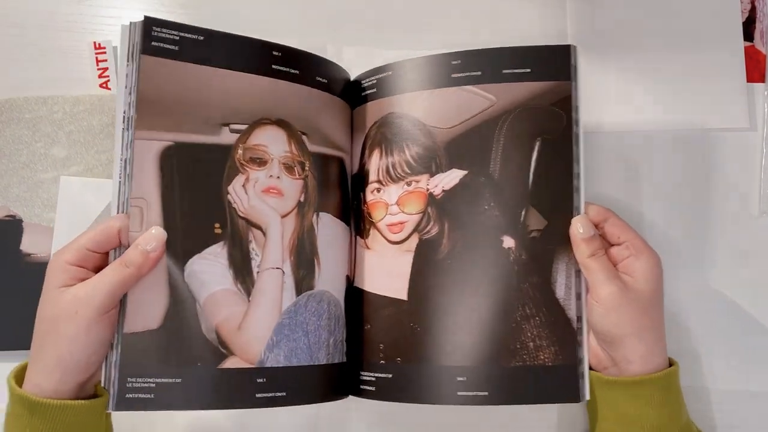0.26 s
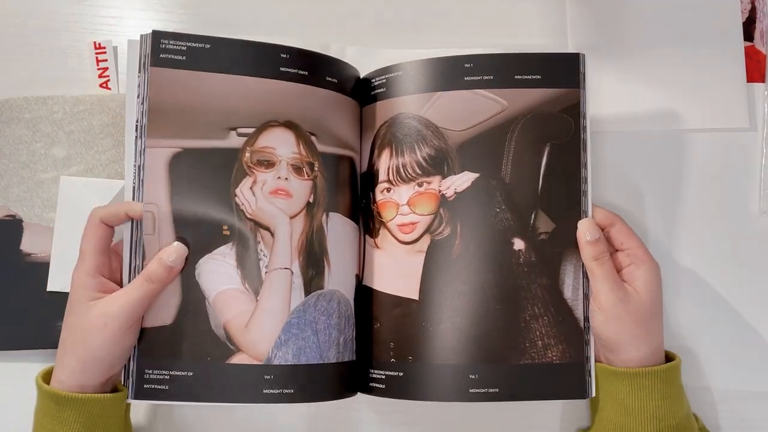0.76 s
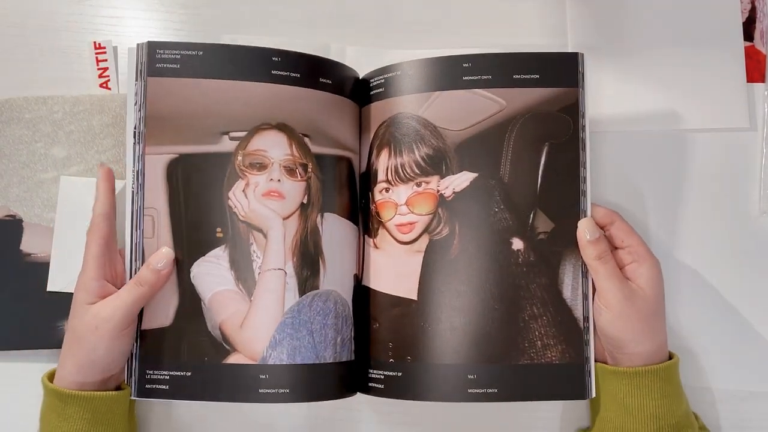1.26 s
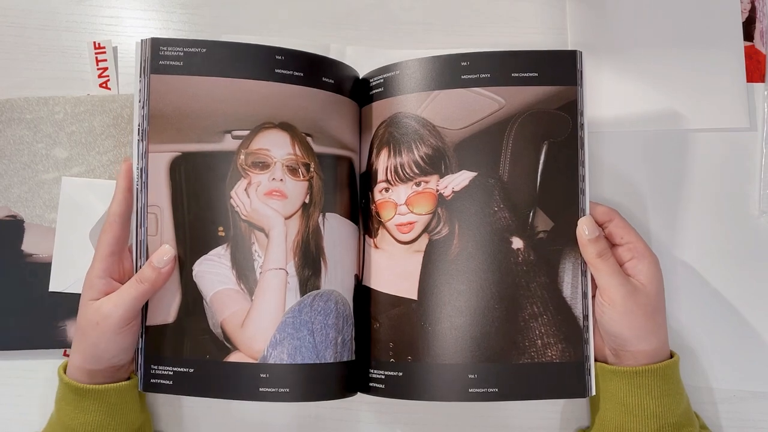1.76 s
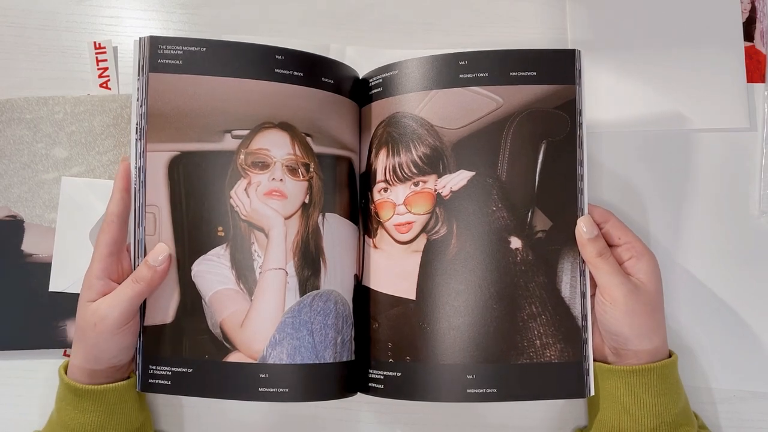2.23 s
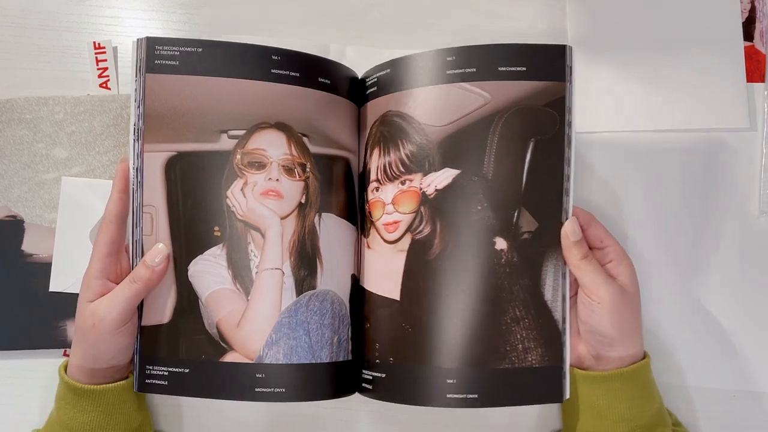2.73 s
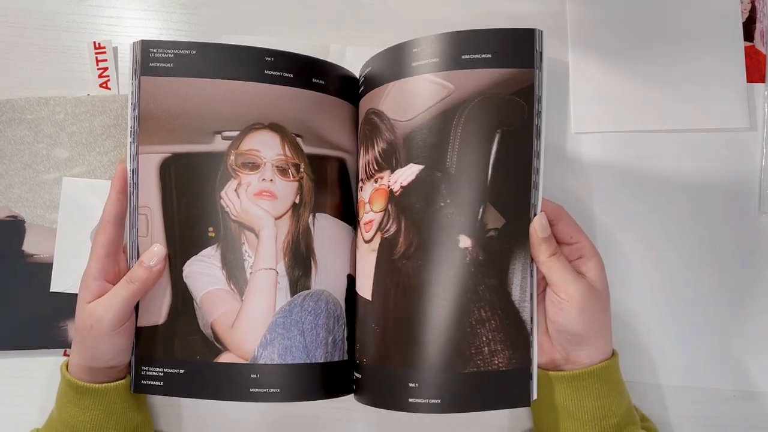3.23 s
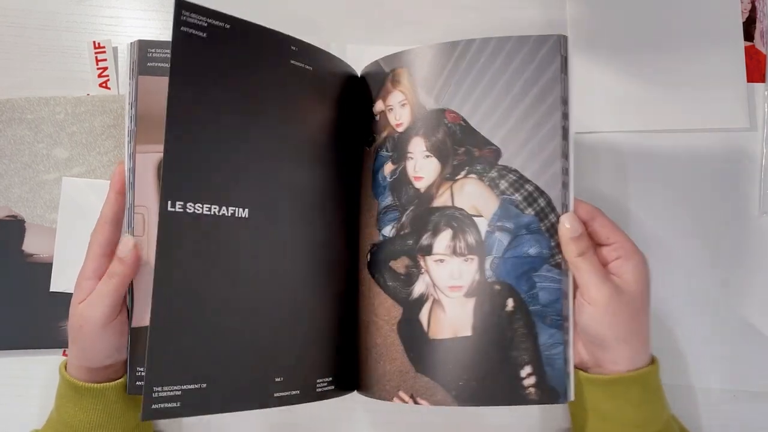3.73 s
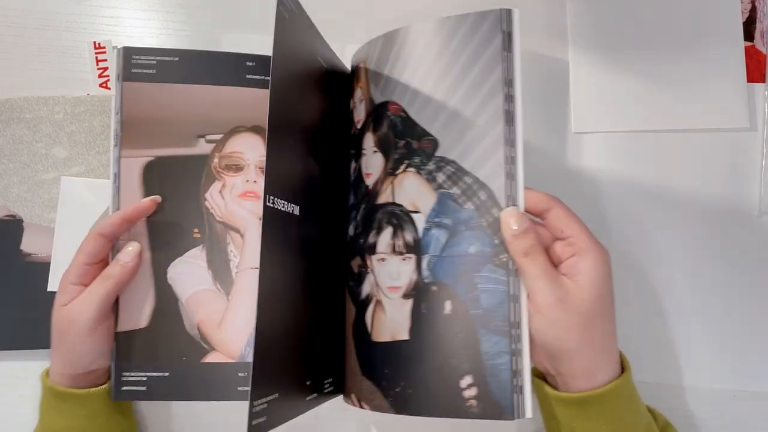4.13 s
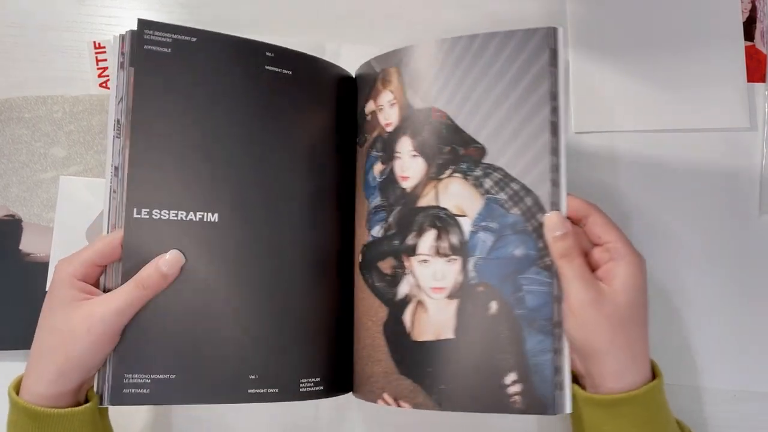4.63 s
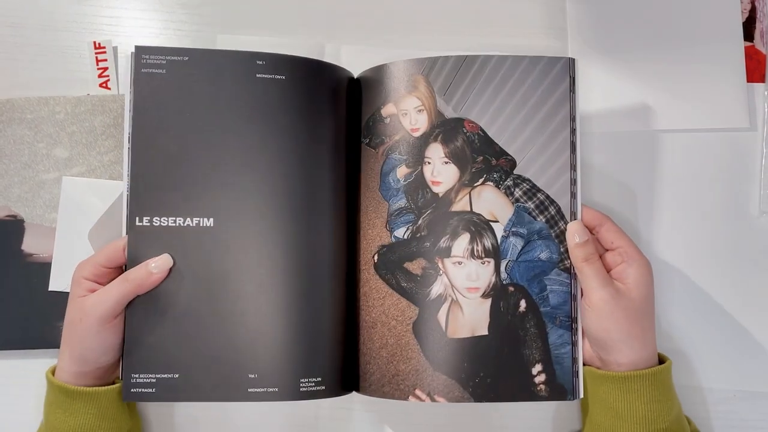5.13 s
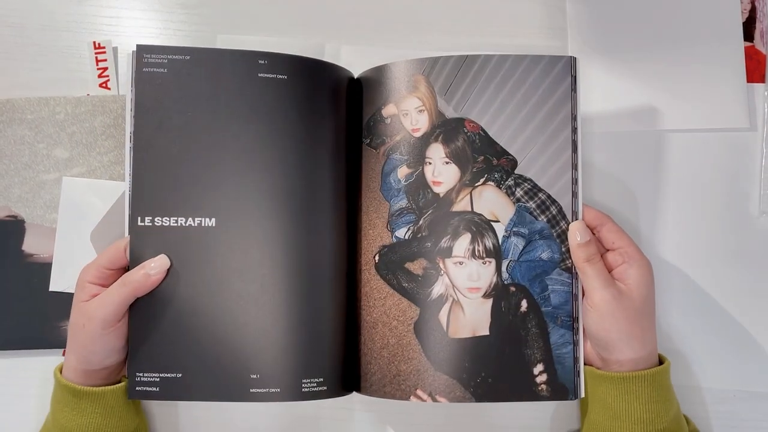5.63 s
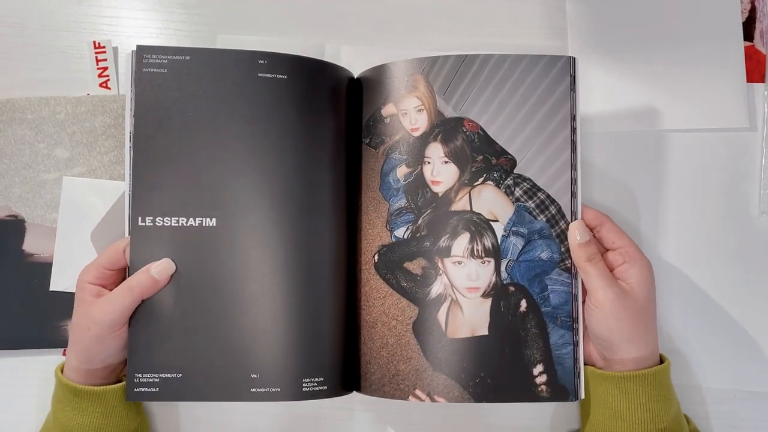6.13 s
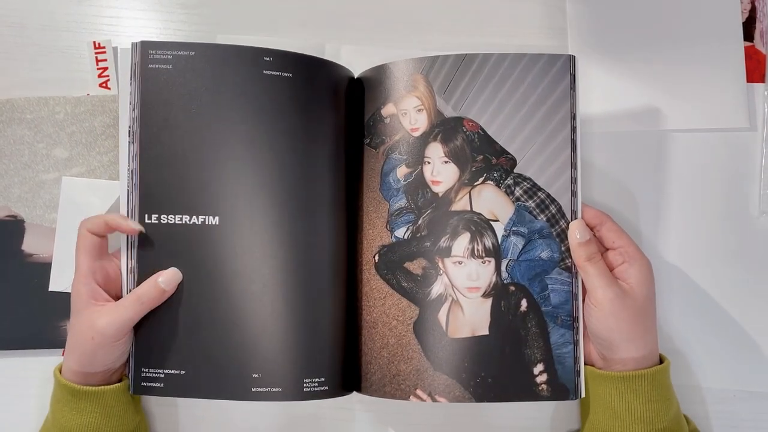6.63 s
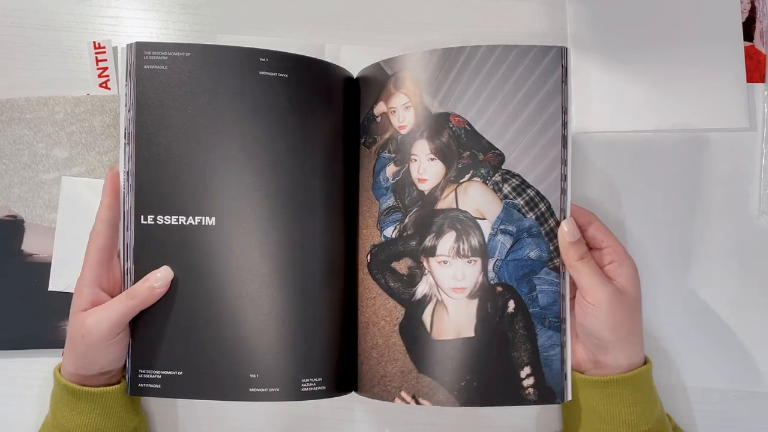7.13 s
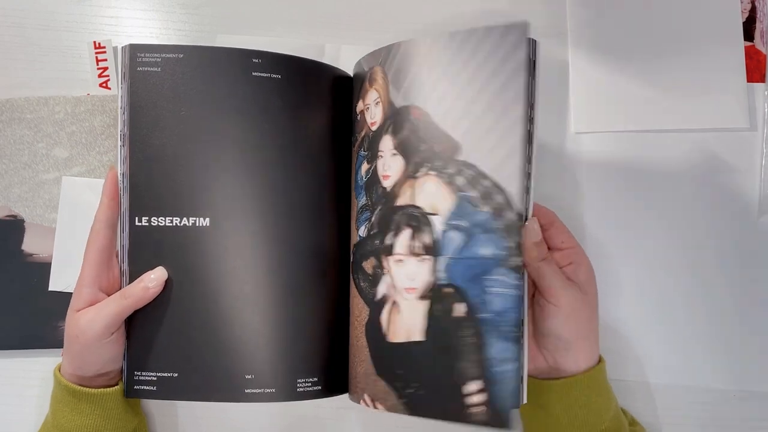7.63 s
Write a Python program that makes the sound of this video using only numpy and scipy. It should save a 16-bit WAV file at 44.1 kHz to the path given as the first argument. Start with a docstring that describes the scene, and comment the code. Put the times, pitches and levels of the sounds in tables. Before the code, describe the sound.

Fingers slide over glossy album pages that flap and snap as they turn, with one hard knock on a table early on.

```python
"""Fingers leaf through a thick photo album on a table in a quiet room.
Skin hisses over the glossy pages, sheets bend and flap, and their edges snap and ring.
Early on the spine knocks hard on the table; the pages thud softly and the binding ticks.
Behind it all the room rumbles and hums faintly. Two microphones hear it slightly out of step."""
import sys
import numpy as np
from scipy import signal
from scipy.fft import rfft, irfft, next_fast_len
from scipy.io import wavfile
from scipy.ndimage import uniform_filter1d, map_coordinates

SR = 44100
rng = np.random.default_rng(int(sys.argv[2]) if len(sys.argv) > 2 else 0)


def dump(signal):
    """Clip the signal to [-1, 1] and save it as 16-bit WAV at the path in sys.argv[1]."""
    limited = np.clip(np.atleast_2d(signal).T, -1, 1)
    pcm = np.round(limited * 32767).astype(np.int16)
    wavfile.write(sys.argv[1], SR, pcm)


N = 347067

# tone of a snap or tick: f/Hz, level/dB
CRACK_TONE = [(300, 1), (1000, 4), (2200, 0.5), (5000, -0.5), (16000, -14.5)]
LIFT_S, FLAP_S = 0.04, 0.049  # fade times (to fall 60 dB): a finger lifts; a flap or thud ends


def fingers():
    """Fingers drag over the pages in long slides and short rubs, with an ever-changing grip."""
    # one loudness curve per slide: t/s, level/dB
    slides = [
        [(0.01, -72), (0.08, -64.5), (0.125, -79)],
        [(0.16, -73.5), (0.184, -69.5), (0.296, -69), (0.357, -56)],
        [(0.47, -74.5), (0.57, -61), (0.7, -57), (0.9, -61.5)],
        [(1.02, -73), (1.046, -68), (1.3, -81)],
        [(2.4, -85), (2.65, -72), (2.85, -90)],
        [(3.525, -86.5), (3.545, -72.5), (3.78, -82)],
        [(4.08, -82.5), (4.168, -75.5), (4.18, -63.5), (4.29, -89)],
        [(4.39, -84), (4.55, -62), (4.585, -72.5)],
        [(4.617, -61.5), (4.655, -61.5), (4.74, -86.5)],
        [(4.747, -71), (4.79, -71), (4.825, -80)],
        [(5.33, -74.5), (5.39, -74.5), (5.41, -90.5)],
        [(6.16, -74), (6.182, -63.5), (6.34, -61.5), (6.395, -67)],
        [(6.54, -87.5), (6.588, -77.5), (6.73, -86.5)],
        [(6.73, -92), (6.87, -78.5), (6.99, -79), (7.12, -87.5)],
    ]
    # added to each slide's level: hollow/dB, gloss/dB, bending/dB
    slide_tones = [(-20, -11.5, -2.5), (-11, -8.5, -10), (-9, -6.5, -22.5), (-24, -18, -6.5),
                   (-16, -4.5, -23), (-8, -12, 0), (-20, -10.5, -5.5), (0, -10, -2.5), (2.5, -12.5, -13),
                   (10, -20, -2.5), (9, -1, -7), (-6.5, -4, -10), (-32.5, 7, -17), (-14, -3.5, -4.5)]
    # fingertip rubs: t/s, length/s, level/dB, added for hollow/dB, added for bending/dB
    rubs = [(0.905, 0.013, -57.5, -10, 0), (1.211, 0.011, -64, -21, 1), (2.112, 0.023, -72.5, -17, -13),
            (3.817, 0.056, -79, -5.5, 1), (3.906, 0.036, -69.5, -24, 1), (4.926, 0.11, -67.5, 0, -4),
            (5.049, 0.065, -63.5, 0.5, -8.5), (5.19, 0.034, -80.5, 10, -4), (5.788, 0.023, -68, -6, -4),
            (5.897, 0.011, -67, -1.5, -2), (5.936, 0.069, -77.5, 3.5, -18), (6.005, 0.025, -67.5, -5, -6.5),
            (6.4, 0.015, -53, -9.5, -4.5), (6.415, 0.091, -74, -22, -11)]
    # how alike left and right are: f/Hz, likeness (1 = same)
    likeness = [(200, 0.98), (1000, 0.16), (2000, 0.97), (6000, 0.28), (8000, 1), (10500, 0.92),
                (15500, 0.58)]
    touches = list(slides) + [arch(s, length, db, fade_db=13) for s, length, db, *_ in rubs]
    tones = list(slide_tones) + [(hollow, -7.5, bend) for *_, hollow, bend in rubs]
    hollow_db, gloss_db, bend_db = np.transpose(tones)
    drag = friction(grit_db=2.0, patchy_db=2.0)
    rubbing = skin(drag, touches, hollow_db, gloss_db) + sheets(drag, touches, bend_db)
    grip = amp(1.7 * wobble(45))
    return stereo(grip * rubbing, likeness)


def friction(grit_db, patchy_db):
    """Two rubbing noises: tiny uneven slips, with tones that come and go as the hand moves."""
    slips = rng.standard_normal((2, N)) * amp(grit_db * wobble(900))
    spectrum = signal.stft(slips, nperseg=256)[2]
    patches = uniform_filter1d(rng.standard_normal(spectrum.shape[1:]), size=3, axis=0)
    patches = uniform_filter1d(patches, size=28, axis=1)
    return signal.istft(spectrum * amp(patchy_db * unit(patches)), nperseg=256)[1][:, :N]


def skin(drag, touches, hollow_db, gloss_db):
    """Skin hisses on the coating; the hollow under the finger and the page edge colour it."""
    # tone of sliding skin: f/Hz, level/dB
    slide_tone = [(900, -28), (1700, -1), (3000, -1), (7500, -9.5), (12000, -24.5)]
    # high hiss of the gloss: f/Hz, level/dB
    gloss_tone = [(4000, -27), (7000, -3.5), (10000, 0.5), (13000, -6.5), (16000, -3)]
    # the cupped hand changes shape: t/s, hollow/Hz, whistle along the page edge/Hz
    hand = [(0.171, 2244, 3377), (0.351, 2302, 4636), (.55, 1895, 5340), (0.749, 2603, 5780),
            (2.649, 2800, 4604), (4.6, 1856, 5042), (4.8, 2300, 5387), (6.2, 2052, 4993),
            (6.601, 2190, 5596), (6.949, 2597, 4795)]
    times, hollow_hz, edge_hz = np.transpose(hand)
    hollow = moving_band(drag, times, hollow_hz, width_hz=1000)
    whistle = moving_band(drag, times, edge_hz, width_hz=1700)
    slide = unit(unit(coloured(drag, slide_tone)) + amp(-7.5) * whistle)
    gloss = unit(coloured(drag, gloss_tone))
    return (strokes(touches, LIFT_S) * slide
            + strokes(touches, LIFT_S, hollow_db) * hollow
            + strokes(touches, LIFT_S, gloss_db) * gloss)


def sheets(drag, touches, bend_db):
    """A bending sheet rustles, and pushes the air with a low flap."""
    # tone of a bending sheet: f/Hz, level/dB
    bend_tone = [(200, -24.5), (450, -4.5), (750, 2), (1200, -8.5), (2000, -36)]
    # bends with no finger sliding: t/s, length/s, level/dB, added for flap/dB
    bends = [(0.918, 0.043, -70.5, 5), (3.313, 0.037, -70, 4), (3.929, 0.109, -74, 2),
             (4.118, 0.084, -84.5, 15), (4.846, 0.045, -74.5, 11.5), (4.945, 0.031, -68, -1.5),
             (6.254, 0.117, -69, -25), (7.743, 0.053, -68, 6), (7.817, .05, -83.5, 9.5)]
    moves = touches + [arch(s, length, db) for s, length, db, _ in bends]
    rustle = unit(coloured(drag, bend_tone))
    flap = unit(filtered(drag, lambda f: resonance(f, hz=280, width_hz=290)))
    bending = strokes(moves, LIFT_S, np.pad(bend_db, (0, len(bends))))
    tremble = amp(-92.5 + 2.7 * wobble(5.4))  # held pages never rest quite still
    touch_flap_db = -0.5 + 1.76 * bend_db  # the more a sheet bends, the deeper it sounds
    flap_db = [*touch_flap_db, *np.transpose(bends)[3]]
    return (bending + tremble) * rustle + strokes(moves, FLAP_S, flap_db) * flap


def snaps():
    """A page edge lets go with a crack, then the sheet rings briefly; high tones die first. A few soft flaps of
    a sheet ring the same way, with barely any crack."""
    # edge snaps, plus a few soft sheet flaps that ring strongly: t/s, strength/dB, added for ring/dB, ring fade
    # time/s, pitch/Hz
    page_hits = [(1.357, -63.5, -7, 0.038, 657), (2.252, -66.5, -1, 0.027, 620), (3.31, -48, -6, 0.018, 850),
                 (3.446, -85, 11, .05, 537), (3.594, -79.5, 11, 0.039, 661), (3.829, -60, -10, 0.024, 909),
                 (3.918, -56, -17, 0.016, 1180), (3.953, -78, 14, 0.047, 482), (4.146, -80, 13.5, 0.094, 309.4),
                 (4.520, -49.5, -16, 0.044, 643), (4.6202, -52, -16, 0.031, 635), (4.840, -53, -3, 0.063, 685),
                 (6.405, -55.5, -3, 0.061, 632), (6.965, -67.5, -4, 0.061, 756), (7.553, -50, -5.5, 0.015, 795),
                 (7.7543, -44, 0.5, 0.049, 650)]
    # tones of a ringing page: multiple of the pitch, level/dB
    page_tones = [(.53, -3), (1, 13), (1.43, 6.5), (3.25, 10.5)]
    cracks, rings = np.zeros((2, N + SR))
    t = np.arange(SR // 8) / SR
    chance = rng.standard_normal((len(page_hits), 2, len(page_tones)))
    for (s, db, ring_db, fade_s, pitch_hz), (detunes, gains) in zip(page_hits, chance):
        span = slice(round(s * SR), round(s * SR) + len(t))
        cracks[span] += burst(t, db, rise_s=0.0004, fade_s=0.011)
        onset = amp(db + ring_db) * (1 - np.exp(-t / 0.0025))
        for (multiple, tone_db), detune, gain in zip(page_tones, detunes, gains):
            hz = pitch_hz * multiple * (1 + 0.02 * detune)
            fade = amp(tone_db + 2 * gain - 60 * t * multiple / fade_s)
            rings[span] += onset * fade * np.sin(2 * np.pi * hz * t)
    return amp(11.5) * coloured(cracks[:N], CRACK_TONE) + rings[:N]


def knock():
    """The spine hits the table once and sets its top ringing."""
    # tones of the table top: f/Hz, width/Hz, level/dB
    table_tones = [(64, 18, -4), (104, 10, 1), (142, 11, -4), (222, 17, 4), (343, 16, -1), (430, 50, -8),
                   (719.7, 200, 3), (1230, 470, -3.5), (2030, 450, -6), (3050, 370, -9), (4900, 5000, -19)]
    blow = np.zeros(N)
    blow[round(0.3641 * SR)] = amp(28.43)

    def table_top(f):
        ring = sum((-1) ** k * amp(db) * resonance(f, hz, width)
                   for k, (hz, width, db) in enumerate(table_tones))
        delay = np.exp(-0.72j * np.sqrt(f))  # bending waves bring the high tones first
        cushion = 1 / (1 + 1j * f / 8000) ** 7  # the cover softens the hit
        return ring * delay * cushion
    return filtered(blow, table_top)


def bumps():
    """The block of pages thuds softly as the heavy album shifts in the hands."""
    # shifts of the album: t/s, length/s, level/dB
    shifts = [(0.925, 0.071, -58), (2.195, 0.092, -63), (3.312, 0.049, -65), (3.432, 0.061, -59),
              (4.12, 0.13, -63), (4.936, 0.052, -60.5), (5.139, 0.063, -61.5), (7.756, 0.086, -59.5)]
    thud = unit(filtered(rng.standard_normal(N), lambda f: resonance(f, hz=106, width_hz=102) ** 2))
    return strokes([arch(*row) for row in shifts], FLAP_S) * thud


def ticks():
    """The binding gives soft, dry cracks with no ring."""
    # binding ticks: t/s, strength/dB
    binding = [(2.868, -70.5), (3.541, -70), (7.073, -66), (7.447, -71), (7.721, -70.5)]
    cracks, t = np.zeros(N + SR), np.arange(SR // 20) / SR
    for s, db in binding:
        cracks[round(s * SR):][:len(t)] += burst(t, db + 4.5, rise_s=0.0035, fade_s=0.058)
    return coloured(cracks[:N], CRACK_TONE)


def walls(x, delay_s):
    """The walls send back two unrelated echoes whose high tones die sooner."""
    # how long the room rings: f/Hz, fade time/s
    fades = [(100, 0.37), (2000, 0.32), (6000, 0.2), (15000, 0.095)]
    hz, t, spectrum = signal.stft(rng.standard_normal((2, SR // 2)), SR, nperseg=128)
    tail = signal.istft(spectrum * amp(-60 * t / along(fades, hz)[:, None]), SR, nperseg=128)[1]
    late = np.pad(x, (round(delay_s * SR), 0))[None]
    echo = signal.fftconvolve(late, tail / np.linalg.norm(tail[0]), axes=1)[:, :N]
    return filtered(echo, lambda f: (1j * f / (246 + 1j * f)) ** 2)  # little echo below 246 Hz


def air():
    """The room's air rumbles faintly; its bass swells and sinks."""
    # tone of the air: f/Hz, level/dB
    air_tone = [(40, -4.5), (90, -4), (160, -12), (500, -23.5), (1300, -33), (2500, -37), (3200, -33.5),
                (6000, -41.5), (12500, -50), (16000, -60.5)]
    # slow drift of the bass: t/s, level/dB
    drift = [(0, 0), (5.9, -0.5), (6.7, -3.5), (7.3, 0)]
    noise = unit(coloured(rng.standard_normal((2, N)), air_tone))
    drift_db = np.interp(np.arange(N) / SR, *np.transpose(drift))
    swell = amp(drift_db + wobble(2.9) + 3.4 * wobble(5.9))
    bass = filtered(noise, lambda f: 1 / (1 + (f / 900) ** 2))
    return amp(-68) * (noise + (swell - 1) * bass)


def hum():
    """A low, wavering hum: noise squeezed into one narrow band."""
    noise = rng.standard_normal(N)
    return amp(-75) * unit(filtered(noise, lambda f: resonance(f, hz=120, width_hz=4.5)))


def amp(db):
    """Turn decibels into a gain."""
    return 10 ** (np.asarray(db) / 20)


def unit(x):
    """Scale x to an average power of 1."""
    return x / np.sqrt(np.mean(x ** 2) + 1e-20)


def along(points, hz):
    """Read between (f/Hz, value) points on a log frequency axis."""
    f, values = np.transpose(points)
    return np.interp(np.log(hz + 1), np.log(f + 1), values)


def wobble(rate):
    """A smooth random curve through `rate` points a second."""
    return map_coordinates(rng.standard_normal(int(N * rate / SR) + 4), [np.arange(N) * rate / SR])


def filtered(x, response):
    """Scale and delay each frequency of x by response(f)."""
    size = next_fast_len(N + SR // 4, True)
    return irfft(rfft(x, size) * response(np.fft.rfftfreq(size, 1 / SR)), size)[..., :N]


def coloured(x, tone):
    """Shape x with a tone table."""
    return filtered(x, lambda f: amp(along(tone, f)))


def resonance(f, hz, width_hz):
    """One ringing tone, with gain 1 at its centre."""
    return 1j * f * width_hz / (hz * hz - f * f + 1j * f * width_hz)


def moving_band(x, times, hz, width_hz):
    """Keep a band of x whose centre glides over time."""
    f, t, spectrum = signal.stft(x, SR, nperseg=256)
    gain = 1 / (1 + (2 * (f[:, None] - np.interp(t, times, hz)) / width_hz) ** 4)
    return unit(signal.istft(spectrum * gain, SR, nperseg=256)[1][:, :N])


def burst(t, db, rise_s, fade_s):
    """Noise that rises fast and dies away."""
    return amp(db - 60 * t / fade_s) * (1 - np.exp(-t / rise_s)) * rng.standard_normal(len(t))


def arch(start, length, db, fade_db=0):
    """A loudness curve that falls by fade_db, with both ends 6 dB softer."""
    way = np.linspace(-1, 1, num=9)
    return np.transpose([start + length * (way + 1) / 2, db - fade_db * way / 2 - 6 * way ** 4])


def strokes(curves, fade_s, extra_db=0):
    """A gain that follows each loudness curve and dies away afterwards."""
    t, gain = np.arange(N) / SR, np.zeros(N)
    for curve, more_db in zip(curves, np.broadcast_to(extra_db, len(curves))):
        times, db = np.transpose(curve)
        span = slice(round(times[0] * SR), round(times[-1] * SR))
        gain[span] += amp(np.interp(t[span], times, db) + more_db)
    decay = amp(-60 / (fade_s * SR))
    return signal.lfilter([1 - decay], [1, -decay], gain)


def stereo(pair, likeness):
    """Mix two unrelated signals into left and right with the given likeness."""
    angle = lambda f: np.arccos(np.clip(along(likeness, f), -1, 1)) / 2
    mid, side = filtered(pair, lambda f: np.array([np.cos(angle(f)), np.sin(angle(f))]))
    return np.array([mid + side, mid - side])


def scene():
    """The album's sounds, their echo and the quiet room."""
    # how alike the room is left and right: f/Hz, likeness (1 = same)
    likeness = [(60, 1), (350, 0.38), (800, 0.018), (3000, 0.32), (8000, 1), (10500, .7), (13000, 0.98)]
    blow, cracks, rubbing = knock(), snaps() + ticks(), fingers()
    bright_blow = filtered(blow, lambda f: 1 + 1j * f / 1550)  # the walls get a brighter knock
    echo = walls(amp(-14) * bright_blow + amp(-12) * (cracks + rubbing[0]), delay_s=0.0021)
    return blow + cracks + rubbing + bumps() + stereo(echo + air(), likeness) + hum()


def record(dry):
    """Left and right drift apart in phase across frequency, differ a little in level, and keep nothing above
    15800 Hz."""
    # how far right runs ahead of left: f/Hz, lead/half cycles
    lead = [(100, 0), (700, -.12), (1200, 0), (3000, .14), (6000, .4), (7000, .75), (7500, 1), (9200, 1),
            (10000, 1.3), (12000, 2), (14200, 2), (16000, 2.7)]
    turn = np.array([[-1], [1]]) * np.pi / 2
    shifted = filtered(dry, lambda f: np.exp(1j * turn * along(lead, f)) * (f < 15800))
    return amp([[-0.3], [0.3]]) * shifted


dry = scene()
out = record(dry)
dump(out)
```